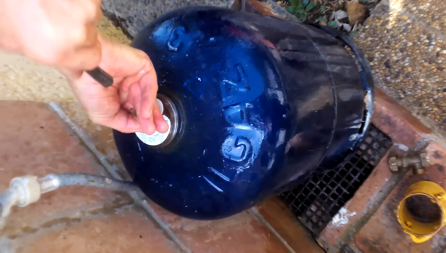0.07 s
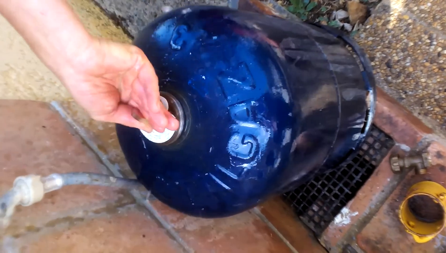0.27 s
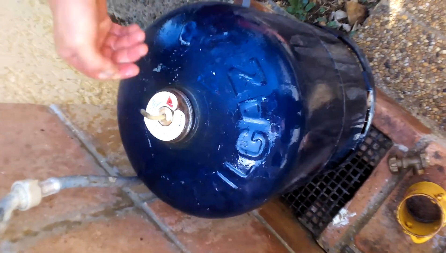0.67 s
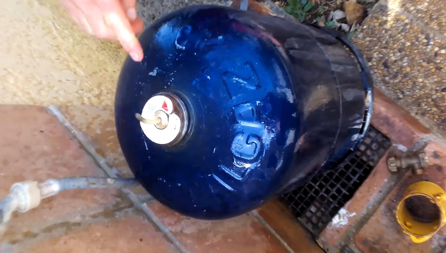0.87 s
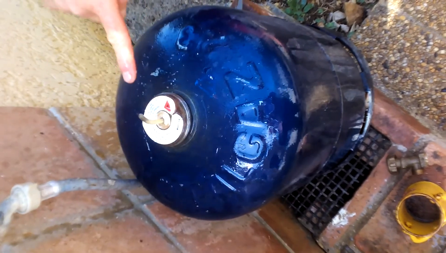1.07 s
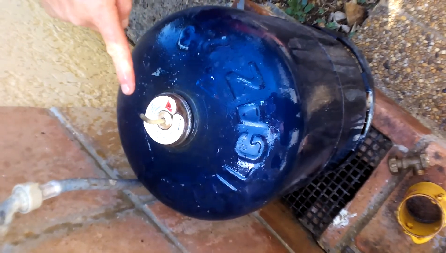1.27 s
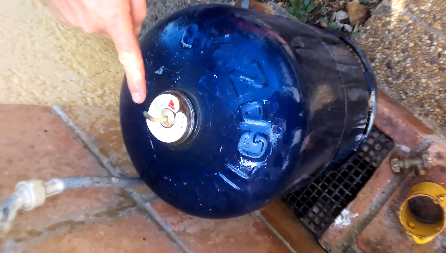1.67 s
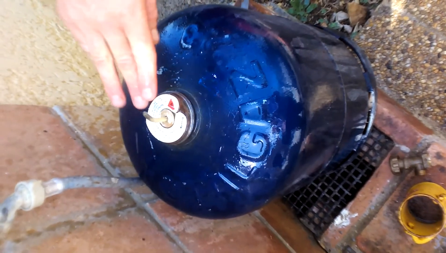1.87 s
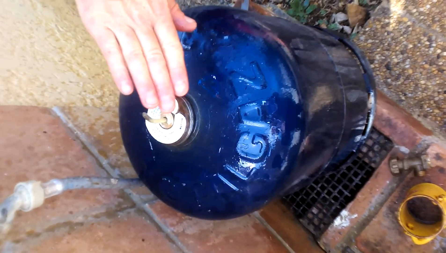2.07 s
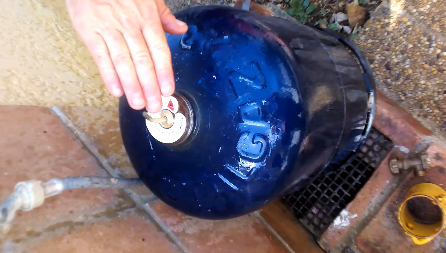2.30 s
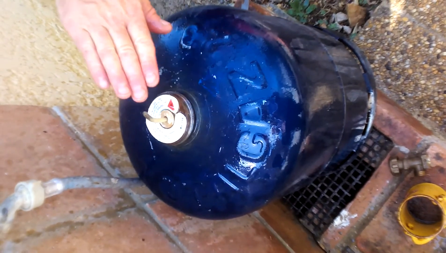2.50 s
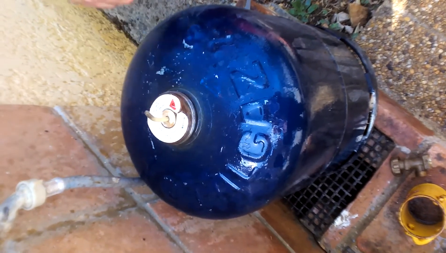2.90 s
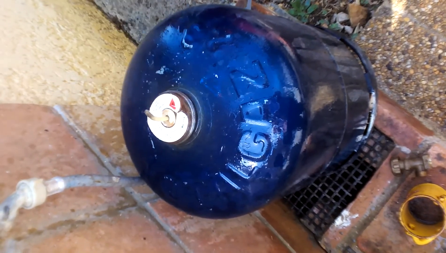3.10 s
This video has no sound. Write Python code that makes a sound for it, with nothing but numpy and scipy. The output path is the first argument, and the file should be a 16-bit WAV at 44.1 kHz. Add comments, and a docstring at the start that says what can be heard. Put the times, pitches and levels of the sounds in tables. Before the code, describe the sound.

Gas hisses from a cylinder valve, close up outdoors, starting with a sharp crack and spit at 0.2 seconds. The hiss whistles slightly, then dulls, with soft low thumps at 0.9 and 1.3 seconds. It swells over a finger around 1.6 seconds. From 2.1 seconds a cupped hand makes a hollow roar that dips and rises in pitch, ending with a small spurt near 3 seconds, leaving faint hiss.

```python
"""Outdoors, close to the valve of a steel gas cylinder.
The seal sings faintly, cracks open and spits, and the jet hisses on, duller as the pressure sinks.
Two soft handling thumps sound on the way. A finger cuts into the jet and the gas rushes over the skin,
then a cupped hand turns the hiss into a hollow roar and pulls away."""
import sys
import numpy as np
from scipy import signal
from scipy.fft import rfft, irfft
from scipy.io import wavfile
from scipy.ndimage import uniform_filter1d

SR = 44100
rng = np.random.default_rng(int(sys.argv[2]) if len(sys.argv) > 2 else 0)


def digitize_waveform(pressure):
    """Quantize a signal to 16-bit integers and store it at the path in sys.argv[1].

    Rows of a 2-D input are taken as channels; values are limited to [-1, 1].
    """
    field = np.atleast_2d(pressure).T
    bounded = np.clip(field, -1, 1)
    quanta = np.round(bounded * 32767).astype(np.int16)
    wavfile.write(sys.argv[1], SR, quanta)


N = 143325
FRAME, HOP = 512, 128
T, FULL_HZ = np.arange(N) / SR, np.fft.rfftfreq(N, 1 / SR)
FRAME_T, FRAME_HZ = np.arange(N // HOP + 5)[:, None] * HOP / SR, np.fft.rfftfreq(FRAME, 1 / SR)
OPEN_S, OPEN_RISE_S = 0.205, 0.012
PATCH_DB, JET_FLICKER_DB, HAND_FLUTTER_DB = 1.05, 0.83, 0.82  # depths of the turbulence

# Tone of the outdoor bed. Each row: frequency in Hz, relative level in dB.
AIR_TONE = [(25, -10), (110, 11), (600, 2.5), (4000, -1), (7500, -6.5), (12000, -19)]
# Spurts of gas. Each row: start, rise, hold and decay in seconds, level in dB, treble share in dB.
SPURTS = [(.196, 0.0028, 0.0071, 0.0038, -59.5, -3), (0.227, 0.0095, 0.0133, 0.0012, -37.5, 8.5),
          (2.091, 0.0022, 0.0048, 0.0062, -48, 4.5), (2.937, 0.008, 0.016, 0.0034, -46.5, -5)]
# Body and sizzle of a spurt. Each row: frequency in Hz, relative level in dB.
SPURT_BODY_TONE = [(200, -18), (650, 5), (1500, -2.5), (2900, 14.5), (3900, -51), (8000, -61)]
SPURT_TREBLE_TONE = [(1000, -35), (3900, -21), (4900, 1), (6300, -7.5), (7600, -18.5), (12000, -38.5)]
# Fader rides for the free jet, the rush over the fingers and the buffeting on the skin.
# Each row: time in seconds, level in dB.
JET_RIDE = [(.30, -39.5), (.45, -37), (.70, -38.5), (.85, -42), (1.2, -45), (1.51, -46), (1.59, -38.5),
            (1.66, -37), (1.80, -42), (2.07, -49.5), (2.925, -50.5), (2.945, -48), (2.963, -47),
            (2.974, -53), (3.25, -54.5)]
RUSH_RIDE = [(.21, -39), (.26, -34), (.285, -46), (.45, -44.5), (.58, -48.5), (1.5, -52.5), (1.59, -49),
             (1.85, -43), (2.02, -44), (2.075, -57), (2.105, -46), (2.25, -56), (2.70, -49), (2.8, -44.5),
             (2.925, -44.5), (2.96, -44.5), (2.972, -51.5), (3.08, -65)]
BUFFET_RIDE = [(.21, -60), (.268, -47.5), (.295, -56.5), (.44, -56.5), (.6, -80), (1.45, -73), (1.9, -60.5),
               (2.07, -62), (2.33, -51.5), (2.53, -68.5), (2.9, -67.5), (2.98, -82)]
# Tone of those three layers. Each row: frequency in Hz, relative level in dB.
JET_TONE = [(100, -67), (300, -36), (550, -19.5), (950, -9.5), (2500, -4), (3900, -6), (4700, -0.5),
            (6400, -1), (7300, -5), (8000, -14), (10100, -23), (12000, -30)]
RUSH_TONE = [(30, -27), (100, -25), (280, -10.5), (600, 1.5), (950, -2.5), (1500, 7), (4000, 1.5),
             (6500, -4.5), (9000, -21), (12000, -101)]
BUFFET_TONE = [(25, -28), (150, -16.5), (260, 0), (380, 0.5), (600, -13), (1500, -70)]
# The jet's treble roll-off. Each row: time in seconds, loss in dB per octave.
JET_ROLLOFF = [(.3, 0), (1.35, 6), (1.68, 8.5), (2.2, 21)]
# Edge tone of the nozzle. Each row: time in seconds, lift over the hiss in dB, width in Hz.
EDGE_TONE = [(.28, 3.5, 270), (.45, 10.5, 270), (.70, 11.5, 260), (.82, 8, 270), (1.45, 0.5, 300),
             (1.65, 3.5, 794), (1.85, 1, 300)]
# Peaks and dips from the valve, the dome and the wall. Each row: centre in Hz, width in Hz, gain in dB.
SURFACE_EQ = [(574, 80, 5.5), (752, 50, 4.5), (1000, 90, -3.5), (1192, 60, 3.5), (1465, 60, 3),
              (1640, 220, 4), (1890, 150, -5), (2100, 300, 3), (3366, 70, 3), (3860, 220, -3.5),
              (4400, 170, -3.5), (4645, 70, 3.5), (6560, 110, 3)]
# Resonances of the valve. Each row: centre in Hz, width in Hz, relative level in dB.
VALVE_RING = [(1640, 370, -4), (2340, 200, 7), (5080, 260, -11), (6160, 1340, -8.5)]
# Handling knocks. Each row: start in seconds, level in dB, boost of the low modes in dB.
KNOCKS = [(0.905, -25, 1.5), (1.3279, -30, 11.5)]
# Ring of a knock. Each row: pitch in Hz, relative level in dB, time to fall 60 dB in seconds.
KNOCK_MODES = [(154, -19, 0.12), (246, 4.5, 0.099), (275, -23, 0.29), (322, -11, 0.093),
               (410, -17.5, 0.087), (571, -19.5, 0.23)]
# Dull tail of a knock. Each row: frequency in Hz, relative level in dB.
RUMBLE_TONE = [(25, 6), (55, -9), (105, 13), (270, -1), (900, -36)]
# The jet caught in the hollow of the hand.
# Each row: time in seconds, level in dB, resonance in Hz, lift of the second resonance in dB.
CUP_MOVES = [(2.10, -42.5, 1100, 11), (2.18, -41.5, 1110, 4), (2.205, -45, 910, -1), (2.30, -46, 584, 12),
             (2.38, -42.5, 780, 8), (2.46, -41, 1360, 7), (2.60, -38, 1420, 15), (2.712, -39, 1300, 7),
             (2.728, -45, 1190, 6), (2.95, -50, 1470, 19)]
# Stereo spread of the gas. Each row: frequency in Hz, side level against the centre in dB.
SIDE_TONE = [(250, -86), (620, -25), (1300, -15.5), (2200, -83.5), (4450, -14), (5600, -45), (11000, -16)]


def amp(db):
    """Decibels to gain."""
    return 10 ** (np.asarray(db) / 20)


def unit(x):
    """Scales to rms 1."""
    return x / np.sqrt(np.mean(x ** 2) + 1e-20)


def curve(rows, t, column=1):
    """Glides along one column of a time table."""
    rows = np.array(rows)
    return np.interp(t, rows[:, 0], rows[:, column])


def tone_db(tone, hz):
    """Reads a tone table on a log-frequency axis."""
    points_hz, db = np.transpose(tone)
    return np.interp(np.log(hz + 1), np.log(points_hz), db)


def bell(centre, width, hz=FRAME_HZ):
    """An EQ bell of height 1."""
    return 2 ** -((2 * (hz - centre) / width) ** 2)


def equalise(x, gain):
    """Applies one gain per frequency."""
    return irfft(rfft(x) * gain, N)


def noise(tone):
    """Steady noise of rms 1 with the given tone."""
    return unit(equalise(rng.standard_normal(N), amp(tone_db(tone, FULL_HZ))))


def lumps(frames, bins):
    """Smooth random field of rms 1 over time and frequency."""
    field = rng.standard_normal((len(FRAME_T), len(FRAME_HZ)))
    field = uniform_filter1d(field, frames, 0)
    return unit(uniform_filter1d(field, bins, 1, mode="wrap"))


def nearby_surfaces(x):
    """The valve, dome and wall colour the gas noise; the result has rms 1."""
    eq_db = sum(db * bell(centre, width, FULL_HZ) for centre, width, db in SURFACE_EQ)
    return unit(equalise(x, amp(eq_db)))


def turbulence(shape_db, flicker_db):
    """Churning noise of rms 1: a given spectrum with drifting patches and a broad flicker."""
    gain = amp(shape_db)
    gain = gain / np.sqrt(np.mean(gain ** 2, -1, keepdims=True))
    gain = gain * amp(PATCH_DB * lumps(frames=12, bins=8) + flicker_db * lumps(frames=4, bins=120))
    white = rng.standard_normal((len(FRAME_T) - 1) * HOP)
    spectra = signal.stft(white, nperseg=FRAME, noverlap=FRAME - HOP)[2]
    shaped = signal.istft(spectra * gain.T, nperseg=FRAME, noverlap=FRAME - HOP)[1]
    return nearby_surfaces(shaped[:N])


def outdoor_air():
    """A faint, steady bed of open air."""
    return amp(-76) * noise(AIR_TONE)


def leak():
    """Gas sings thinly through the seal until the valve opens."""
    band = bell(centre=4230, width=160, hz=FULL_HZ)
    return amp(-86) * unit(equalise(rng.standard_normal(N), band)) * (T < OPEN_S)


def spurts():
    """Gas spits as the valve opens and as the hand's edge enters and leaves the jet."""
    body, treble, out = noise(SPURT_BODY_TONE), noise(SPURT_TREBLE_TONE), np.zeros(N)
    for start, rise, hold, decay, db, treble_db in SPURTS:
        t = T - start
        envelope = np.clip(t / rise, 0, 1) * np.exp(-np.maximum(t - rise - hold, 0) / decay)
        out += amp(db) * envelope * (body + amp(treble_db) * treble)
    return out


def jet(rolloff_hz=6060, whistle_hz=5080):
    """The hiss dulls as pressure sinks and the hand shades it; the finger broadens its fuzzy whistle."""
    tilt_db = -curve(JET_ROLLOFF, FRAME_T) * np.log2(np.maximum(FRAME_HZ / rolloff_hz, 1))
    whistle_width = curve(EDGE_TONE, FRAME_T, column=2)
    whistle_db = curve(EDGE_TONE, FRAME_T) * bell(whistle_hz, whistle_width)
    hiss = turbulence(tone_db(JET_TONE, FRAME_HZ) + tilt_db + whistle_db, JET_FLICKER_DB)
    return amp(curve(JET_RIDE, T)) * hiss


def fingers():
    """The jet breaks on the fingers in a lower, broader rush with deep buffeting."""
    rush = amp(curve(RUSH_RIDE, T)) * turbulence(tone_db(RUSH_TONE, FRAME_HZ), HAND_FLUTTER_DB)
    buffet = amp(curve(BUFFET_RIDE, T)) * noise(BUFFET_TONE)
    return rush + buffet


def crack(start_s=0.2085, rise_s=0.00074, decay_s=0.004, tail_s=0.013):
    """The seal lets go: a sharp puff rings the valve and dies away in a short tail."""
    t = np.maximum(T - start_s, 0)
    ring = sum(amp(db) / (1 + (2 * (FULL_HZ - hz) / width) ** 2) for hz, width, db in VALVE_RING)
    puff = unit(equalise(rng.standard_normal(N), ring))
    envelope = np.exp(-(t / decay_s) ** 2) + amp(-9) * np.exp(-t / tail_s)
    return amp(-24) * np.minimum(t / rise_s, 1) * envelope * puff


def thumps():
    """Soft knocks, each with a quick rebound, ring a few damped low modes and leave a short rumble."""
    rise_s, rebound_s, rebound_db, low_hz = 0.0046, 0.01306, -14.5, 200
    tail_db, tail_rise_s, tail_t60_s = -23.5, 0.02, 0.32
    out, rumble = np.zeros(N), noise(RUMBLE_TONE)
    for start, level_db, low_db in KNOCKS:
        for delay, blow_db in ((0, 0), (rebound_s, rebound_db)):
            t = np.maximum(T - start - delay, 0)
            attack = amp(level_db + blow_db) * np.minimum(t / rise_s, 1)
            for hz, db, t60 in KNOCK_MODES:
                decay = amp(db + low_db * (hz < low_hz) - 60 * t / t60)
                out -= attack * decay * np.sin(2 * np.pi * hz * t)
        t = np.maximum(T - start, 0)
        out += amp(level_db + tail_db - 60 * t / tail_t60_s) * np.minimum(t / tail_rise_s, 1) * rumble
    return out


def cupped_hand(q=1.7, upper_ratio=2.31, low_cut_hz=288, high_cut_hz=1760, fade_s=0.0098):
    """The jet excites the hollow of the hand, whose pitch falls as it closes and rises as it lifts."""
    pitch = curve(CUP_MOVES, FRAME_T, column=2)
    ratio = (FRAME_HZ + 1) / pitch
    boom_db = 2 * bell(centre=543, width=170)  # air between palm and dome
    upper_db = curve(CUP_MOVES, FRAME_T, column=3) * bell(upper_ratio * pitch, width=740)
    resonance_loss = 1 + (q * (ratio - 1 / ratio)) ** 2
    band_loss = (1 + (FRAME_HZ / high_cut_hz) ** 4) * (1 + (low_cut_hz / (FRAME_HZ + 20)) ** 4)
    roar = turbulence(boom_db + upper_db - 10 * np.log10(resonance_loss * band_loss), HAND_FLUTTER_DB)
    start, end = CUP_MOVES[0][0], CUP_MOVES[-1][0]
    fade = np.clip(np.minimum(T - start, end - T) / fade_s + 1, 0, 1)
    return fade * amp(curve(CUP_MOVES, T)) * roar


def gas():
    """Submix of the flow; the sustained layers come in as the valve opens."""
    valve_open = np.clip((T - OPEN_S) / OPEN_RISE_S, 0, 1)
    return valve_open * (jet() + fingers() + cupped_hand()) + crack() + spurts() + leak()


def scene():
    """Everything sits in the centre; scattered gas noise adds a little width."""
    mid = gas() + thumps() + outdoor_air()
    side = equalise(gas(), amp(tone_db(SIDE_TONE, FULL_HZ)))
    return np.array([mid + side, mid - side])


def record(dry):
    """A steep high cut takes the very top off the mix."""
    high_cut = signal.firwin(511, cutoff=12050, window=("kaiser", 9), fs=SR)
    return signal.oaconvolve(dry, high_cut[None], "same")


dry = scene()
out = record(dry)
digitize_waveform(out)
```